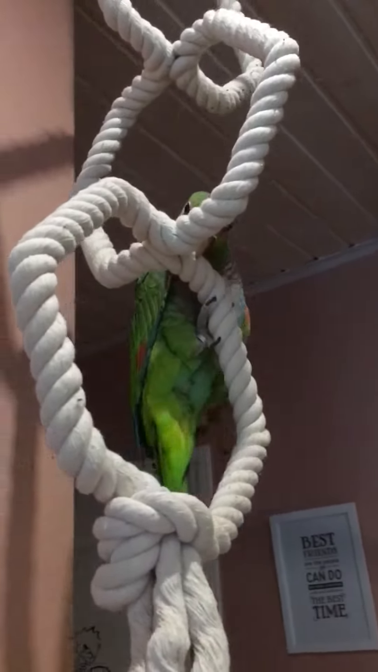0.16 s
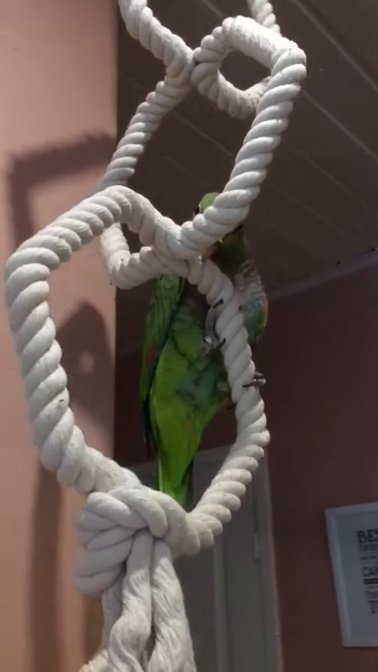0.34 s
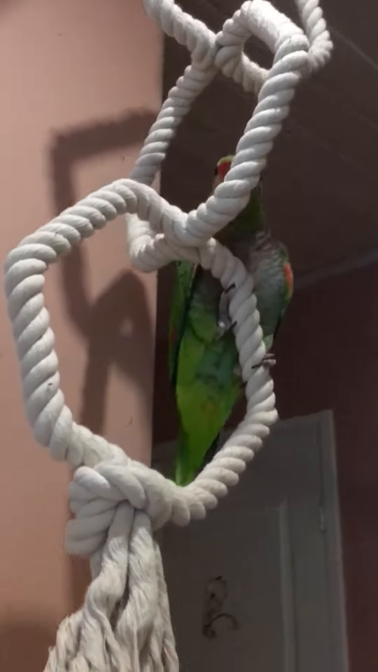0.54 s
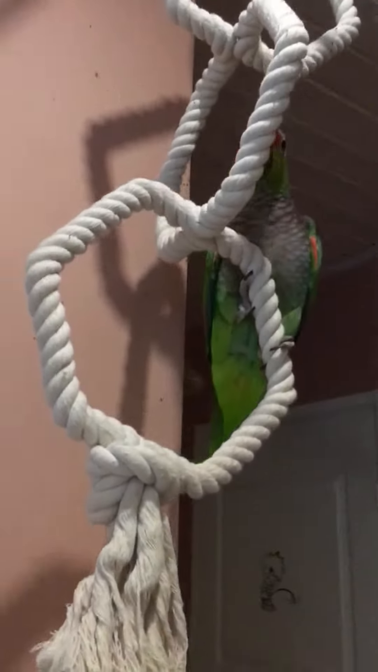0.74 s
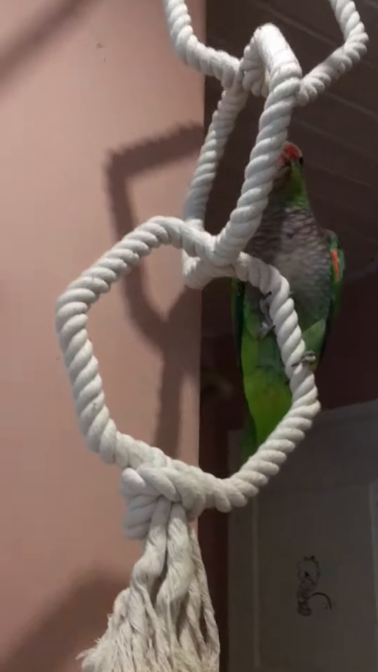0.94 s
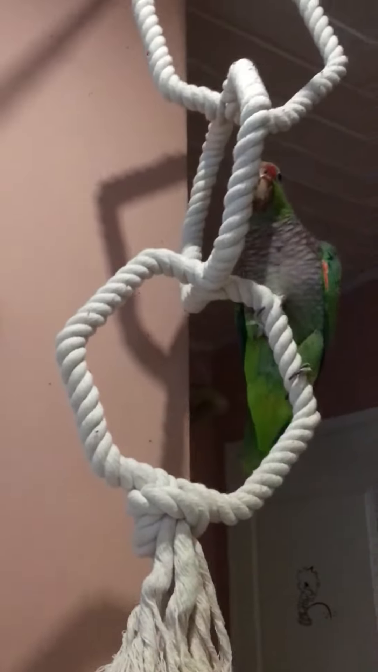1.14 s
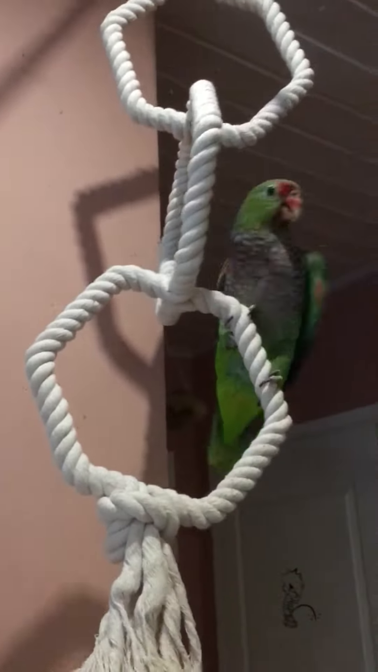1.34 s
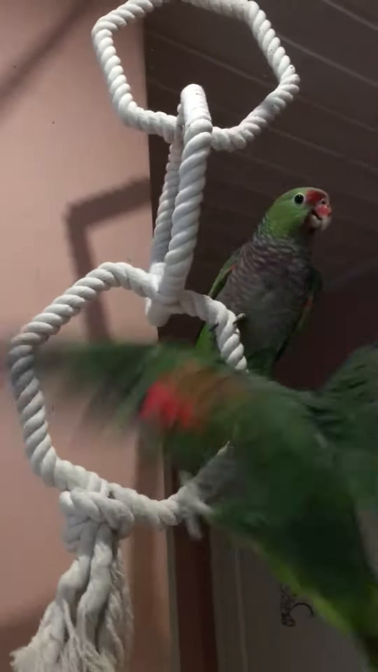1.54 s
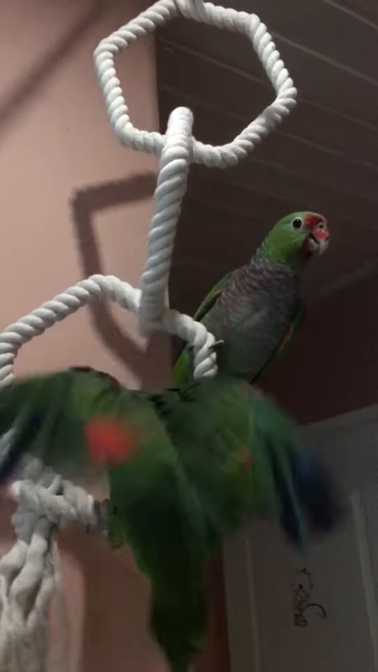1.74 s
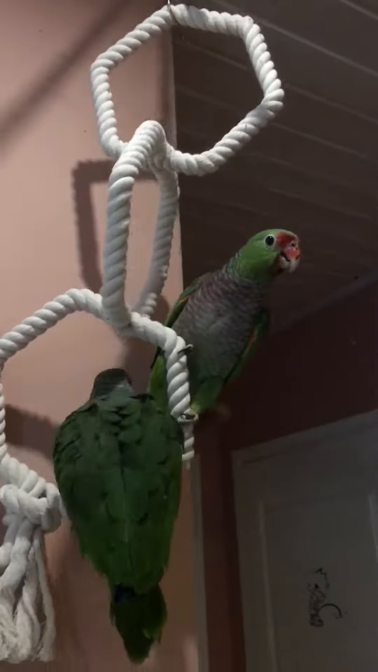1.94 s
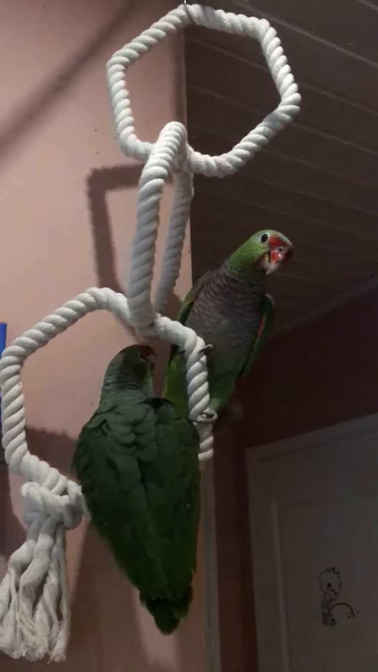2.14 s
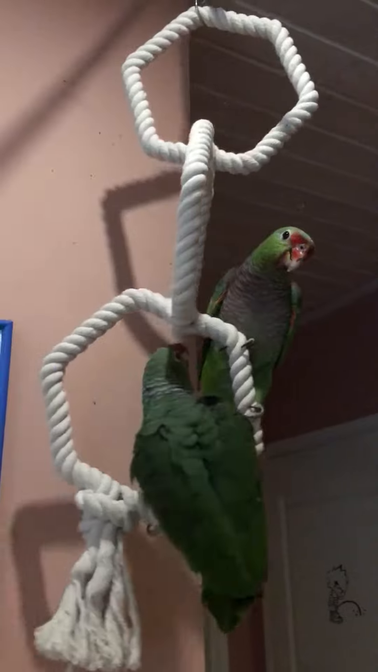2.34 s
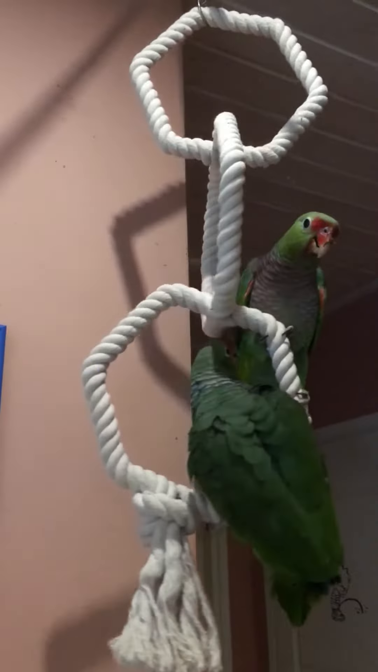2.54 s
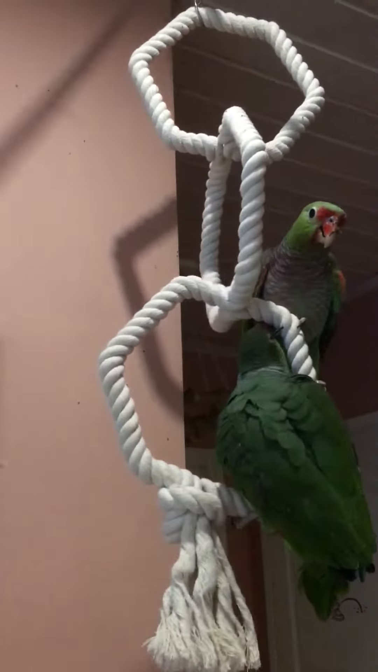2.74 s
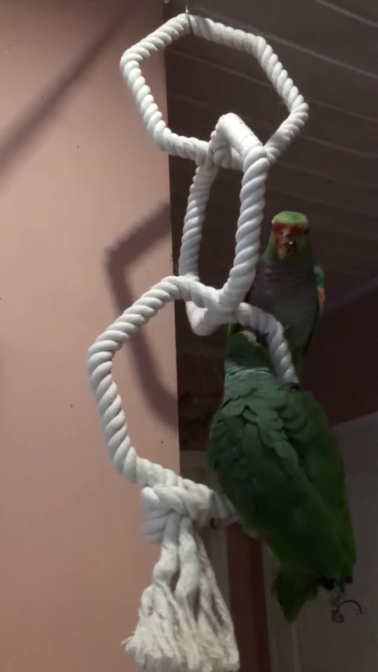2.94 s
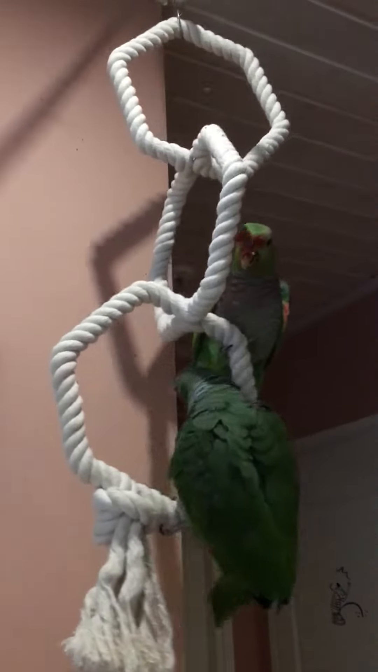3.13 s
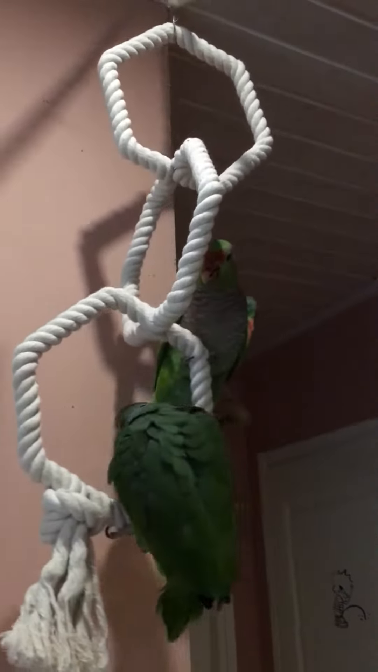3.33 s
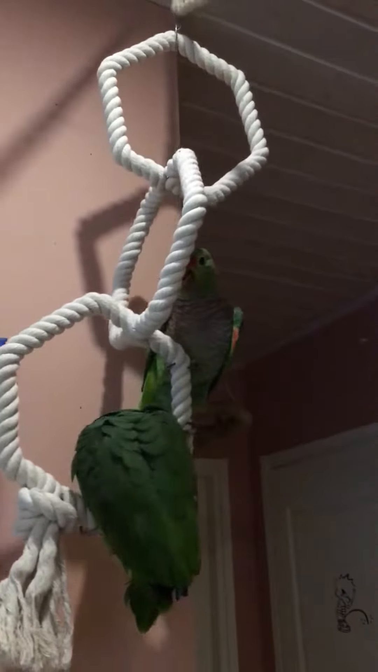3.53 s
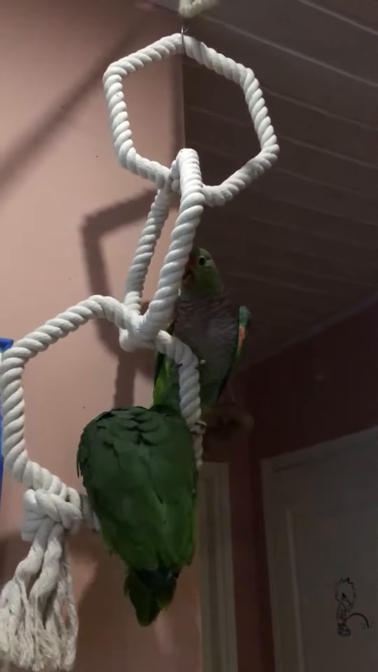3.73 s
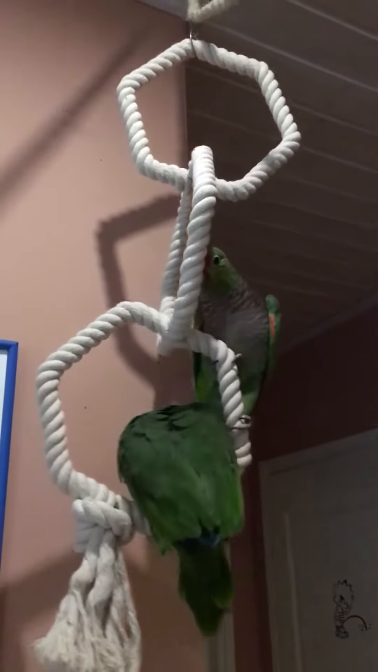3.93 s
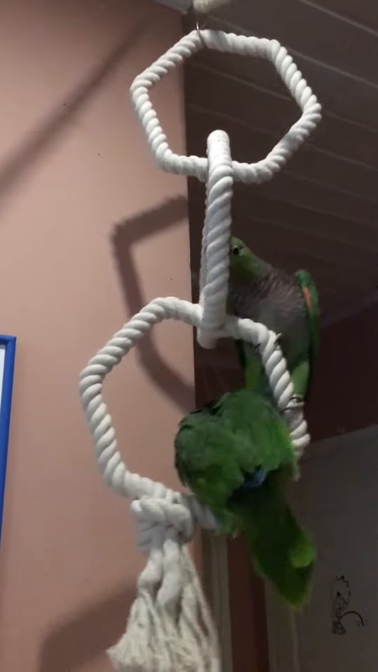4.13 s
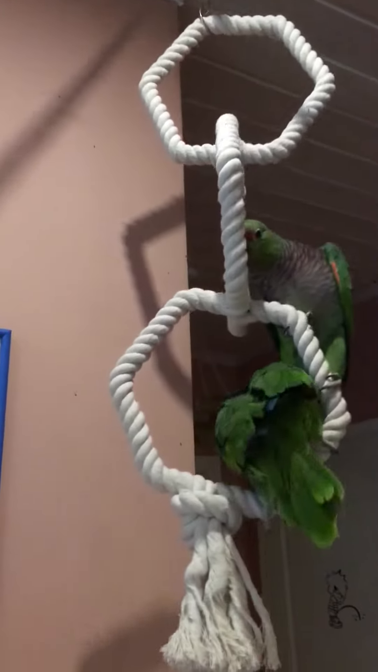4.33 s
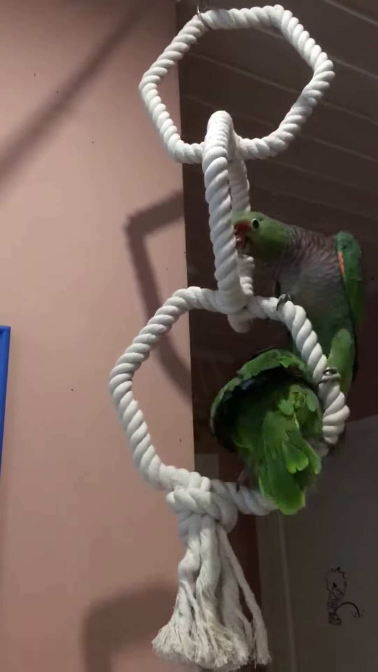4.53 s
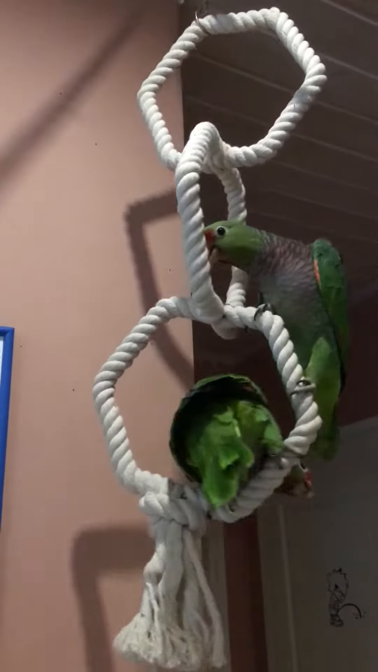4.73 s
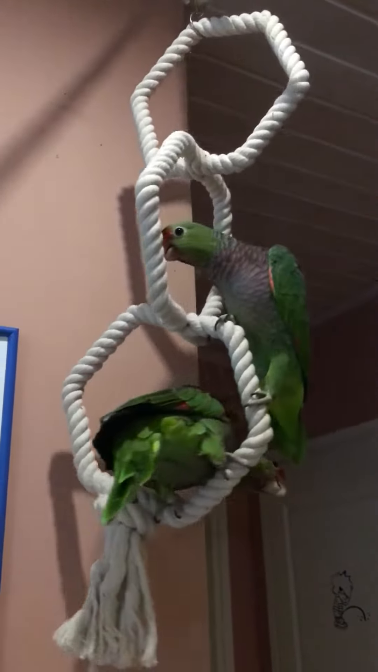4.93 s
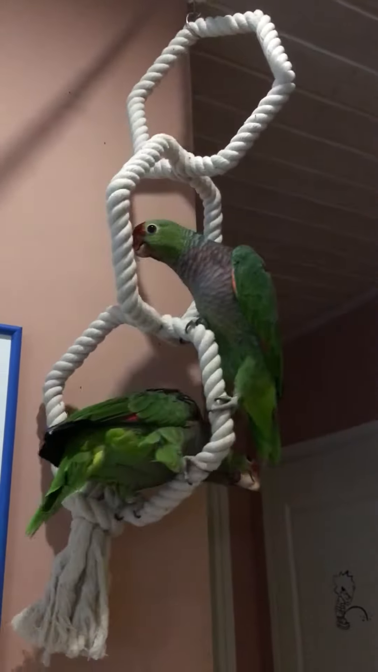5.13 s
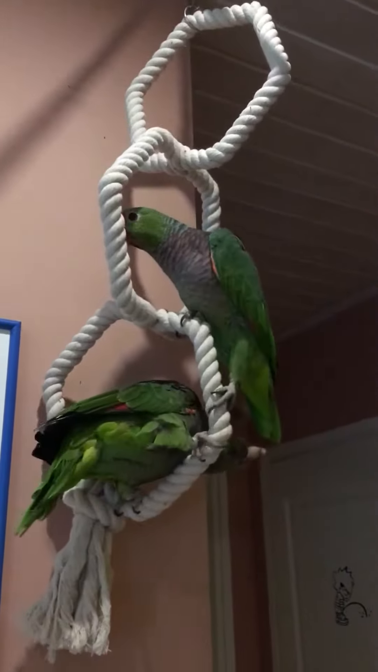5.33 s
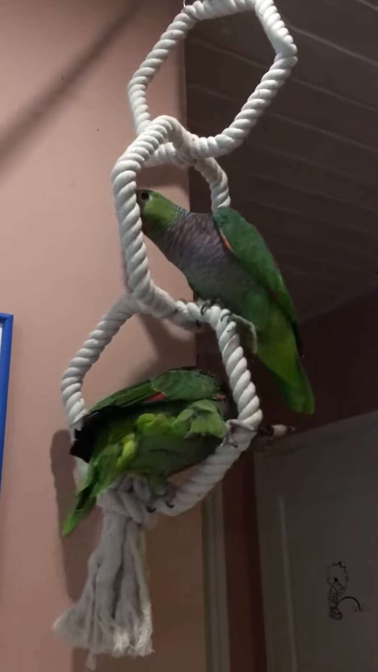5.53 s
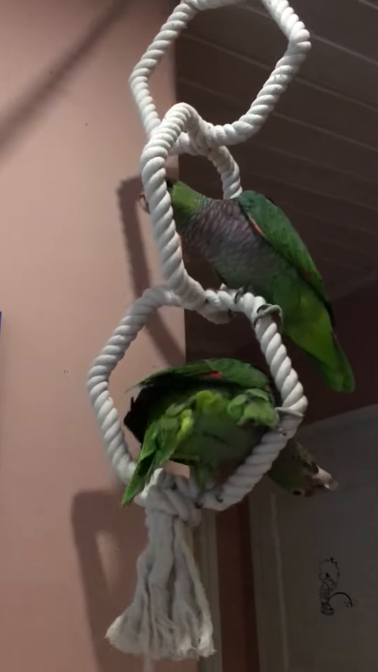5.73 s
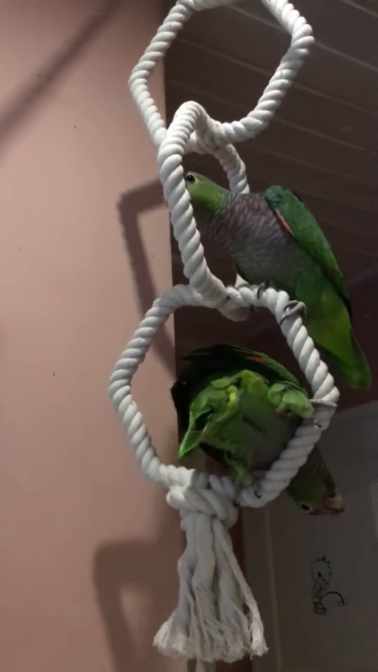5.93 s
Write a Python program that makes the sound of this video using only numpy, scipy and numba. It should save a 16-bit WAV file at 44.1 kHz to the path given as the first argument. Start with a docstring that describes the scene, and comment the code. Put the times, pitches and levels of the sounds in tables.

```python
"""In a quiet, humming room, a parrot flies onto a hanging rope perch close to a phone.
Claws and beak tick on the rope by impact, and feathers rustle on it by friction. Wingbeats buffet
the microphone with pressure pulses and turbulent air. A toy bell on the perch jingles as its clapper
excites pairs of close modes that beat, and the links of its chain clink, rattle and add a thin ring
to each blow. The walls return a dull reverberation of the ticks and the metal."""
import sys
import numpy as np
from scipy import signal
from scipy.fft import rfft, irfft, next_fast_len
from scipy.io import wavfile
from scipy.ndimage import uniform_filter1d
from numba import njit

SR = 44100
rng = np.random.default_rng(int(sys.argv[2]) if len(sys.argv) > 2 else 0)


def unload_audio(sound):
    """Save the sound as a 16-bit wav file, at the path given as the first command line argument."""
    columns = np.transpose(np.atleast_2d(sound))
    # keep every value between -1 and 1, then stretch to whole-number steps
    steps = np.round(np.clip(columns, -1, 1) * 32767)
    wavfile.write(sys.argv[1], SR, steps.astype(np.int16))


N = 267731
T = np.arange(N) / SR

# Clapper blows: start_s, ring_db, crack_db, hum_note_db, softness_db_per_octave,
# upper_share (of the 9 kHz power, 0 to 1), rim_place (-1 to 1)
CLAPPER_BLOWS = [(1.3484, -35, -23.5, -64, -17, .9, .3), (1.357, -17, -14, -31, -7.5, 0, -0.53),
                 (1.501, -51, -10.5, -33.5, 2, .6, .3), (1.5085, -24, -33, -65, -9, 0.4, .3),
                 (1.513, -15.5, -50, -62, -6, 0.5, -0.3), (1.5314, -19, -38.5, -44.5, 2, .9, .3),
                 (1.5574, -30.5, -31.5, -44, 10, 0.3, 0.2), (1.5873, -28.5, -47.5, -46.5, 5, 0.1, -0.1),
                 (1.6018, -25.5, -34, -36, -3, 0.7, .3), (1.63, -25, -31.5, -44, -8, 0, 0.5),
                 (1.6777, -35.5, -20, -55, 3, 0.7, -0.1), (1.6899, -27, -37, -60, -3.5, 0, -0.5),
                 (1.7929, -33, -36, -47, -5, .17, 0.3), (1.8746, -27.5, -13, -31.5, -8.5, 0.6, 0.4),
                 (1.905, -21.5, -19, -46, -4.5, 0, 0.97), (1.9272, -26.5, -47, -44, -12, 0, 0.4),
                 (1.9963, -29, -41.5, -44, -3, 0.3, -0.1), (2.0842, -40, -44.5, -62, -10, 0.5, 0.2),
                 (2.1012, -25, -40, -39.5, -2, 0, 0.36), (2.2911, -22, -23, -41.5, -4.5, 0.87, 0.7),
                 (2.4958, -23, -19, -47, -6, 0.6, 0.74), (2.7816, -55.5, -40.5, -67.5, 2, 0.35, .35),
                 (3.12, -60, -43.5, -71, -5, .3, .4), (3.2158, -25.5, -23.5, -37, -1.5, 0.18, 0.46),
                 (3.487, -31.5, -28, -48.5, 1, 0.35, -0.54), (3.95, -67.5, -49.5, -69, -8, .3, 0.32),
                 (4.0362, -66.5, -47.5, -70.5, -5, 0.32, 0.4), (5.0264, -27.5, -32, -55.5, -6, 0.18, 0.47),
                 (5.2895, -40, -42, -57, -3.5, 0.07, -0.37), (5.5154, -65.5, -58.5, -68, 2.5, 0.06, 0.2)]


def undb(db):
    """Amplitude ratio of a level in decibels."""
    return 10 ** (np.asarray(db, float) / 20)


def level(x, db):
    """Normalisation to an rms level."""
    return x * undb(db) / np.sqrt(np.mean(x ** 2))


def coloured(x, points):
    """Spectral shaping by rows of frequency_hz, gain_db."""
    size = next_fast_len(N)
    hz, db = np.transpose(points)
    bin_hz = np.arange(size // 2 + 1) * SR / size
    gain = undb(np.interp(np.log(bin_hz + 1), np.log(hz), db, left=-80, right=-80))
    return irfft(rfft(x, size) * gain, size)[:N]


def wander(rate_hz):
    """Random modulation: held values, smoothed twice, with a spread near 1."""
    hold = int(SR / rate_hz)
    steps = np.repeat(rng.standard_normal(N // hold + 1), hold)
    return 1.3 * uniform_filter1d(uniform_filter1d(steps, hold), hold)[:N]


def impulses(start_s, size, fill=0.):
    """Impulse train: one sample set at each event, `fill` elsewhere."""
    track = np.full(N, fill)
    track[(np.asarray(start_s) * SR).astype(int)] = size
    return track


@njit
def mode(push, retained, bend, hz, t60_s):
    """Damped oscillator, driven by `push`, choked where `retained` < 1, detuned by the fraction `bend`."""
    out, state, omega = np.empty(len(push)), 0j, 2 * np.pi * hz / SR
    pole = np.exp(1j * omega - np.log(1000) / (t60_s * SR))
    for i in range(len(push)):
        state = state * pole * retained[i] * (1 + 1j * omega * bend[i]) + push[i] + 1e-18
        out[i] = state.imag
    return out


def snaps(events, decay_ms):
    """Impact transients as decaying band noise, from rows of start_s, peak_db, centre_hz, width_octaves."""
    out, t = np.zeros(N), np.arange(1536) / SR
    for start_s, peak_db, centre_hz, octaves in events:
        edges_hz = np.clip(centre_hz * 2. ** (np.array([-.5, .5]) * octaves), 50, 20000)
        burst = rng.standard_normal(len(t)) * np.exp(-t * 1000 / decay_ms)
        snap = signal.lfilter(*signal.butter(2, edges_hz, "band", fs=SR), burst)
        i = int(start_s * SR)
        out[i:i + len(t)] += snap * undb(peak_db) / np.abs(snap).max()
    return out


def room_tone(hum_hz=490):
    """Ambient noise floor: gently wavering air and a thin hum that grows after a while."""
    # Spectrum of the air: frequency_hz, relative_db
    air_spectrum = [(15, -28.5), (30, -13.5), (115, -2.5), (166, -8), (212, 1.5), (260, -5.5), (380, -12.5),
                    (600, -15.5), (880, -20), (945, -12), (1020, -16), (1620, -24), (2300, -26.5),
                    (4600, -37.5), (9300, -37.5), (15000, -43.5), (15900, -49)]
    air = level(coloured(rng.standard_normal(N), air_spectrum) * undb(wander(3)), -55)
    hum = np.sin(2 * np.pi * hum_hz * T + .3 * wander(11)) * undb(wander(6))
    hum_db = np.interp(T, (1.75, 2.05), (-73, -65))
    return air + level(hum, hum_db)


def ticks_and_clinks():
    """Damped impacts: dull claw and beak ticks on the rope, with a few bright clinks of chain links."""
    # Ticks on the rope and clinks of the chain: start_s, peak_db, centre_hz, width_octaves
    contacts = [(.028, -45, 5350, 1.4), (.185, -54, 2260, 0.14), (.57, -47.5, 585, 0.47),
                (.72, -43.5, 580, 0.57), (0.791, -53.5, 4830, .4), (1.0934, -39.5, 2270, 1.4),
                (1.352, -33.5, 290, 0.27), (1.437, -24, 450, 1.6), (1.5243, -21, 2700, 0.25),
                (1.6821, -28.5, 2050, 0.29), (1.714, -30.5, 2310, 0.58), (1.7855, -26, 2390, 0.24),
                (1.9055, -19, 2120, 0.7), (2.1715, -20.5, 2700, 1.84), (2.2175, -34, 2010, 0.62),
                (2.2425, -35, 2400, 0.29), (2.355, -31, 2050, 1.24), (2.362, -39, 623, 0.48),
                (2.413, -38, 1980, 0.63), (2.455, -42.5, 3000, 1.77), (2.5476, -27.5, 2230, 0.71),
                (2.7432, -43, 2530, 1.1), (2.7816, -38, 3500, 2.9), (2.8485, -37, 2360, 0.47),
                (2.851, -32.5, 1023, 0.78), (2.97, -51, 5000, 1.4), (3.044, -49, 2620, 0.58),
                (3.047, -50, 12000, 0.65), (3.0763, -40.5, 4300, .5), (3.125, -53.5, 1920, 0.34),
                (3.1948, -42, 2700, 0.55), (3.235, -34.5, 2430, 0.4), (3.458, -44, 2330, 0.35),
                (3.459, -39, 13000, .4), (3.6002, -36.5, 2320, 1.5), (3.607, -38.5, 2360, 0.52),
                (3.978, -57, 2520, 0.35), (4.0352, -45, 2489, 0.63), (4.372, -55, 2484, 0.41),
                (4.6442, -46, 2280, 0.63), (5.485, -46, 2400, 0.64), (5.486, -53.5, 12660, 0.13),
                (5.516, -54.5, 5040, 1.2), (5.545, -57, 2400, 0.36), (5.8348, -43.5, 2300, 1.1),
                (5.8345, -51, 9000, 1.16)]
    return snaps(contacts, decay_ms=2)


def feather_rustle():
    """Friction noise: feathers brush the rope with a grainy sound; a faint high hiss comes and goes."""
    # Feather noise of the landing: time_s, level_db
    landing = [(1.11, -76), (1.2, -55.5), (1.23, -43.5), (1.34, -40), (1.461, -42.5), (1.7, -50),
               (1.86, -55), (1.98, -56.5), (2.28, -67)]
    # Single brushes on the rope: peak_s, level_db, rise_ms, fall_ms
    brushes = [(.028, -77, 3, 28), (.186, -63.5, 60, 40), (.4, -76, 100, 140), (.598, -64, 60, 68),
               (.714, -62.5, 6, 36), (1.092, -55.5, 2.5, 12), (1.36, -46, 9, 23), (1.502, -20.5, 3, 20.4),
               (1.73, -34.5, 15, 25), (1.784, -35, 22, 50), (1.876, -46, 8, 61), (2.085, -39, 25, 76),
               (2.55, -48, 4, 16), (2.788, -52, 4, 23), (2.975, -62, 4, 25), (3.191, -58, 16.7, 43),
               (3.604, -41.5, 4.4, 18), (3.66, -65, 19, 95), (4.18, -58, 21, 28), (4.4, -67, 52, 120),
               (4.6, -74.5, 26.6, 38), (5.17, -62, 11, 39)]
    # Spectrum of the friction: frequency_hz, relative_db
    friction_spectrum = [(700, -15.5), (2400, 2.5), (4500, -5), (7500, 0), (10500, -3.5), (12900, 0),
                         (15000, -11), (15900, -10)]
    envelope = undb(np.interp(T, *np.transpose(landing), left=-120, right=-120))
    for peak_s, db, rise_ms, fall_ms in brushes:
        slope_ms = np.where(T < peak_s, rise_ms, fall_ms)
        envelope += undb(db) * np.exp(-np.abs(T - peak_s) * 1000 / slope_ms)
    hiss = coloured(rng.standard_normal(N), [(8200, -28), (8900, -4.5), (10000, 0), (10800, -25)])
    hiss_fade = np.interp(T, (.22, .33, .55, .62), (0, 1, 1, 0))
    grain = undb(4 * wander(300))
    friction = level(coloured(rng.standard_normal(N) * grain, friction_spectrum), 0)
    return friction * envelope + level(hiss, -74.5) * hiss_fade


def wingbeats(beat_hz=11, crest_s=1.438):
    """Near-field pressure pulses from the downstrokes, in turbulence that swells once a wingbeat."""
    # Gusts on the microphone: centre_s, peak_db, pitch_hz, half_width_ms
    gusts = [(1.241, -33, 70.6, 13), (1.286, -23.5, 52, 16), (1.336, -29, 83.96, 6.9),
             (1.379, -20.5, 50, 19), (1.464, -22.5, 54, 14), (1.537, -38.5, 113, 22),
             (1.56, -34.5, 47.16, 24), (1.654, -38, 55, 8.6), (1.778, -39.5, 45, 7.8),
             (1.962, -41, 122, 11), (2.061, -36.5, 105, 5.4)]
    # Air off the wings, before the swell of each beat: time_s, low_db, mid_db
    rush = [(1.17, -73, -100), (1.236, -49, -50), (1.36, -37, -40.5), (1.44, -40, -42), (1.52, -43, -42.5),
            (1.58, -56.5, -57.5), (1.84, -60, -63), (2.05, -65, -66), (2.15, -78, -73.5)]
    # Spectra of the low and middle turbulence: frequency_hz, relative_db
    low_spectrum = [(60, 3), (130, 3.5), (300, -1), (600, -5.5), (1000, -14.5)]
    mid_spectrum = [(600, -10.5), (1000, 3), (1600, 1), (2500, -3.5), (3800, -16.5)]
    out = np.zeros(N)
    for centre_s, db, hz, half_width_ms in gusts:
        t = T - centre_s
        out += undb(db) * np.exp(-(t * 1000 / half_width_ms) ** 2) * np.cos(2 * np.pi * hz * t)
    low = level(coloured(rng.standard_normal(N) * undb(2 * wander(40)), low_spectrum), 0)
    mid = level(coloured(rng.standard_normal(N) * undb(4.6 * wander(90)), mid_spectrum), 0)
    time_s, low_db, mid_db = np.transpose(rush)
    beat = np.cos(2 * np.pi * beat_hz * (T - crest_s))
    for band, db, swell_db in ((low, low_db, 5.5), (mid, mid_db, 3.5)):
        out += band * undb(np.interp(T, time_s, db, left=-120, right=-120) + swell_db * beat)
    return out


def bell_and_chain_ring(onset_t60_s=.004):
    """Mode splitting: twin bell modes ring and beat; a thin 13 kHz chain ring sounds with each blow."""
    # Bell modes, and the chain ring at 13.1 kHz: pitch_hz, twin_hz,
    # family (0-5: hum note, 5 kHz, lower and upper 9 kHz, 12 kHz, 15 kHz)
    pair_pitches = [(1750, 1772, 0), (5134, 5116, 1), (8753, 8774, 2), (8918, 8936, 3), (12105, 12085, 4),
                    (12122, 12180, 4), (12770, 12560, 4), (13112, 13135, 4), (13770, 13900, 4),
                    (15345, 15372, 5), (15645, 15300, 5), (11600, 11950, 4)]
    # Damping and strength of the same pairs: t60_s, twin_t60_s, gain_db
    pair_decays = [(.5, .09, 0), (.55, .45, 4), (.4, .33, 2.5), (.22, .15, 0), (.19, .12, 1), (.06, .04, 1),
                   (.12, .12, -14), (.22, .1, -15), (.06, .06, -18.5), (.13, .06, 5), (.08, .08, -5),
                   (.1, .1, -21.5)]
    start_s, ring_db, _, hum_note_db, softness, upper_share, place = np.transpose(CLAPPER_BLOWS)

    def tilted_db(pair, offset_db):
        """Spectral tilt about the 12 kHz ring: a softer blow favours lower modes."""
        return ring_db + offset_db + softness * np.log2(pair_pitches[4][0] / pair_pitches[pair][0])

    upper_share = np.clip(upper_share, .005, .995)
    lower_db = tilted_db(2, -6) + 10 * np.log10(1 - upper_share)
    upper_db = tilted_db(2, -6) + 10 * np.log10(upper_share)
    family_db = (hum_note_db, tilted_db(1, -7), lower_db, upper_db, ring_db, tilted_db(9, -9))
    # on one side of a node the twins start in phase, on the other in antiphase
    twin_weights = (.75, .7 * place, place, place, .5, .5)
    retained = impulses(start_s, .4, fill=1.)  # each blow chokes the old ring
    bend = .00063 * wander(12)  # swinging bends the pitch a little
    out = np.zeros(N)
    for (pitch_hz, twin_hz, family), (t60_s, twin_t60_s, gain_db) in zip(pair_pitches, pair_decays):
        strength, twin = undb(family_db[family] + gain_db), twin_weights[family]
        for weight, hz, decay_s in ((np.sqrt(1 - twin ** 2), pitch_hz, t60_s), (twin, twin_hz, twin_t60_s)):
            push = impulses(start_s, strength * weight)
            out += mode(push, retained, bend, float(hz), decay_s)
            out -= mode(push, retained, bend, float(hz), onset_t60_s)  # cancels the hard start
    # a body this small radiates no bass
    return signal.sosfilt(signal.butter(2, 1400, "high", fs=SR, output="sos"), out)


def clapper_cracks(centre_hz=8000, octaves=1.7):
    """Hard contact: metal on metal gives a bright, broad transient at each clapper blow."""
    cracks = [(start_s, crack_db, centre_hz, octaves) for start_s, _, crack_db, *_ in CLAPPER_BLOWS]
    return snaps(cracks, decay_ms=2.5)


def chain_rattle(hits_per_s=150, scatter_db=5, settle_ms=74.3):
    """Impact excitation: hard knocks, and random collisions that die after each tug, ring the links."""
    # Tugs on the chain: start_s, strength_db
    tugs = [(1.498, -40), (1.72, -45), (1.876, -33), (2.03, -44.5), (2.09, -49)]
    # Hardest knocks between links: start_s, strength_db
    knocks = [(1.5015, -18.5), (1.5239, -29.5), (1.5512, -23), (1.5755, -23), (1.6033, -22.5),
              (1.634, -17.5), (1.7237, -19.5), (1.729, -25.5), (1.7559, -32.5), (1.9148, -35),
              (2.0272, -35.5), (2.035, -28), (2.0637, -28), (2.0889, -22.5), (2.1837, -27.5)]
    # Modes of the links: pitch_hz, t60_s, gain_db
    link_modes = [(4405, .05, -6.5), (4387, 0.029, -10.5), (4200, 0.035, -19.5), (4630, .03, -10.5),
                  (4800, 0.018, -16), (2700, 0.039, -22.5), (2203, 0.039, -25.5), (6870, 0.032, -16.5),
                  (12790, .04, -15)]
    shake = sum(undb(db) * (T > s) * np.exp(-np.abs(T - s) * 1000 / settle_ms) for s, db in tugs)
    hits = (rng.random(N) < hits_per_s / SR) * undb(scatter_db * rng.exponential(size=N) - 1)
    knock_s, knock_db = np.transpose(knocks)
    push = hits * shake + impulses(knock_s, undb(knock_db))
    out = np.zeros(N)
    for hz, t60_s, gain_db in link_modes:
        share = 1 + .73 * rng.standard_normal(N)  # every contact lands elsewhere on the mode shape
        bend = .006 * wander(40)  # no two links ring quite alike
        out += undb(gain_db) * mode(push * share, np.ones(N), bend, float(hz), t60_s)
    return out


def reverberation(x, t60_s=.42, cutoff_hz=9700, gain_db=-7):
    """Diffuse reflection: the walls return an exponential tail, duller than the direct sound."""
    t = np.arange(SR // 2) / SR
    tail = rng.standard_normal(len(t)) * np.exp(-np.log(1000) * t / t60_s) * (t > .003)
    tail = signal.lfilter(*signal.butter(1, cutoff_hz, fs=SR), tail)
    return signal.fftconvolve(x, tail * undb(gain_db) / np.sqrt(np.sum(tail ** 2)))[:N]


def scene():
    """Superposition of the perch sounds, their reverberation, feathers, wings and room tone."""
    ring, chain, ticks, cracks = bell_and_chain_ring(), chain_rattle(), ticks_and_clinks(), clapper_cracks()
    walls = reverberation(chain + cracks + undb(-8) * ring + undb(-1) * ticks)
    return (ring + chain + cracks + ticks + walls + feather_rustle() + wingbeats() + room_tone())[None]


def record(dry):
    """Band limiting: the phone cuts off steeply above 16.9 kHz."""
    return signal.sosfilt(signal.ellip(10, .3, 70, 16900, fs=SR, output="sos"), dry)


dry = scene()
out = record(dry)
unload_audio(out)
```